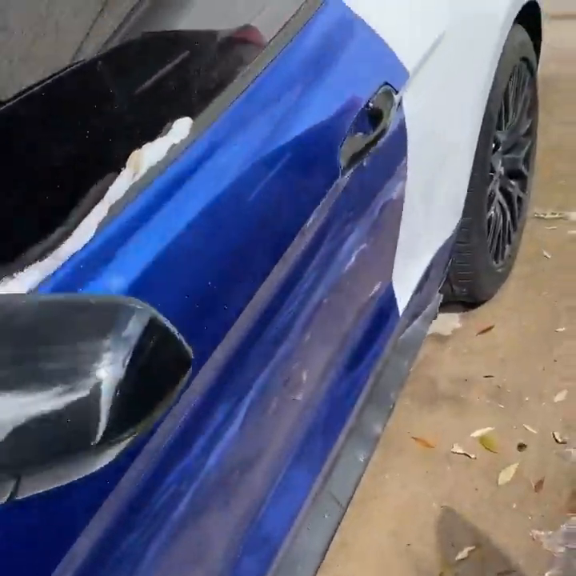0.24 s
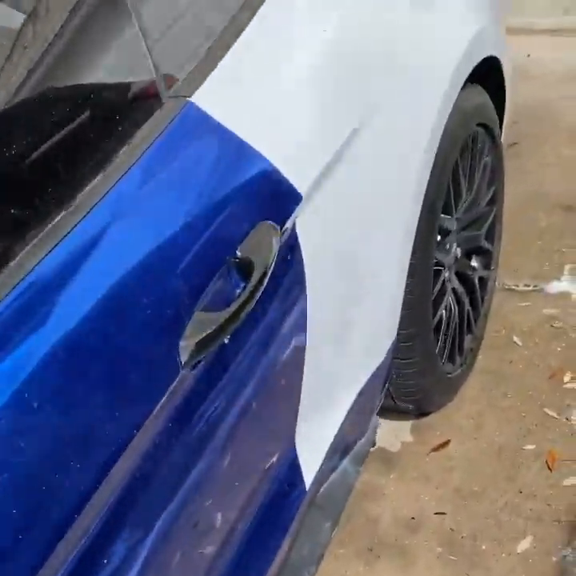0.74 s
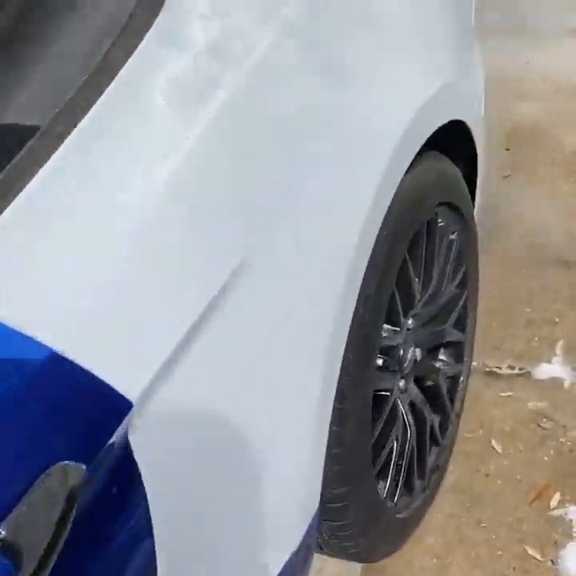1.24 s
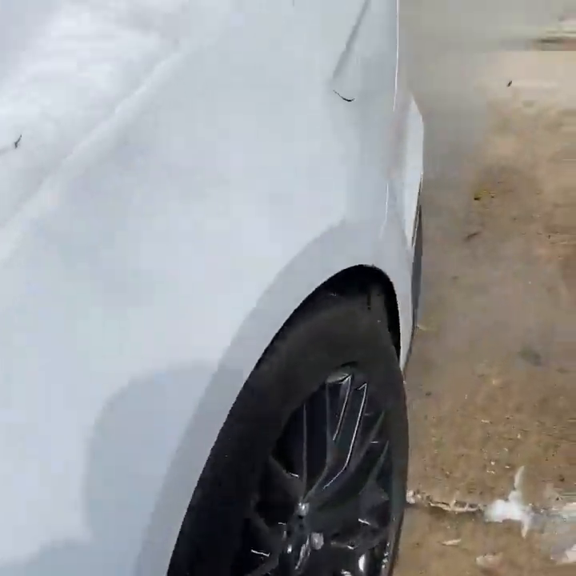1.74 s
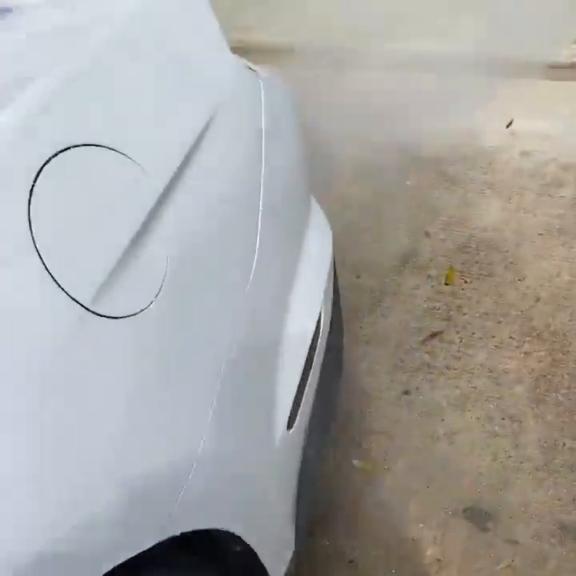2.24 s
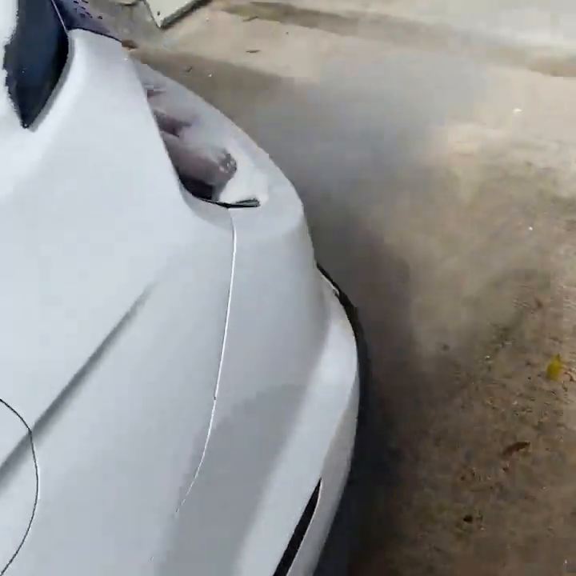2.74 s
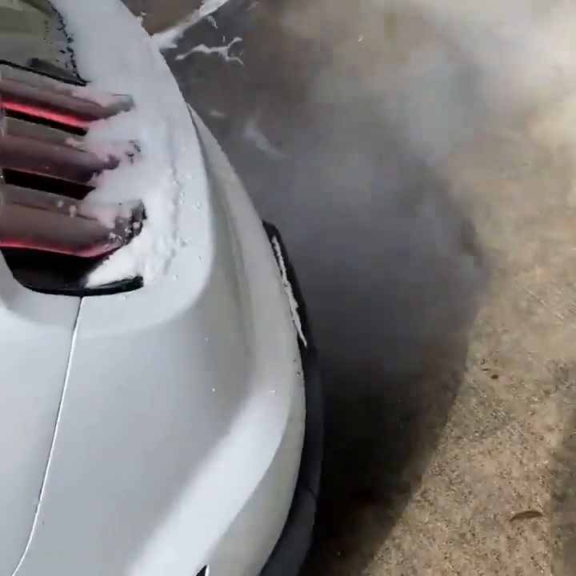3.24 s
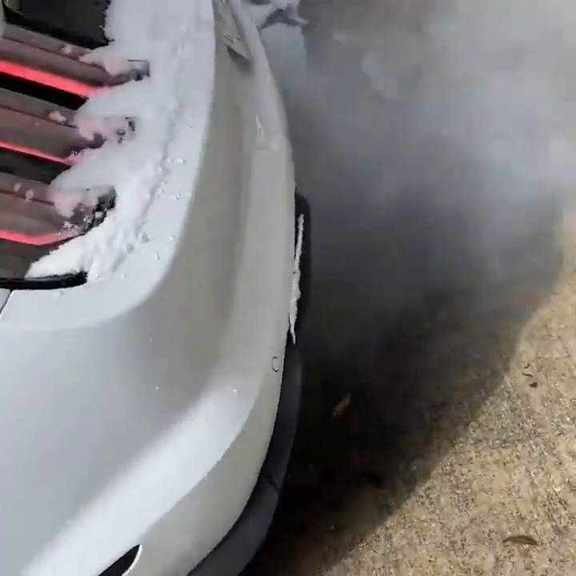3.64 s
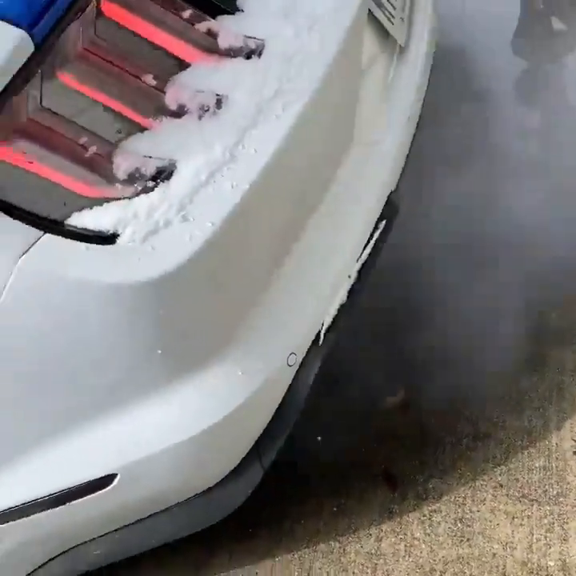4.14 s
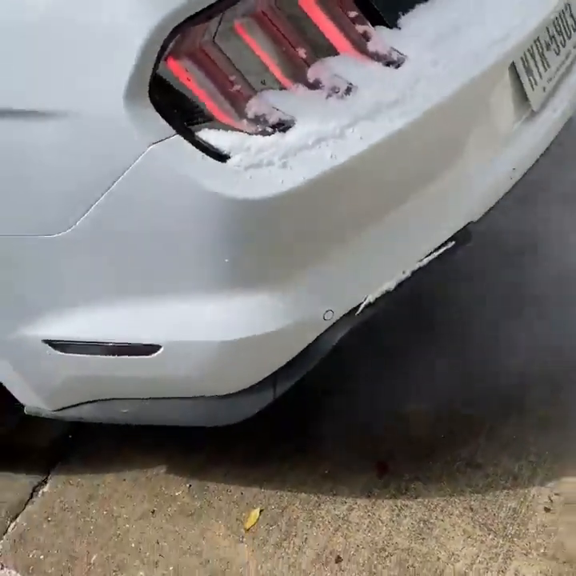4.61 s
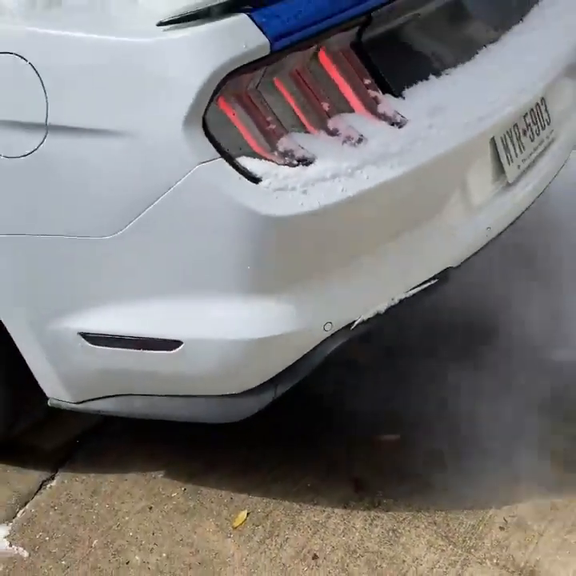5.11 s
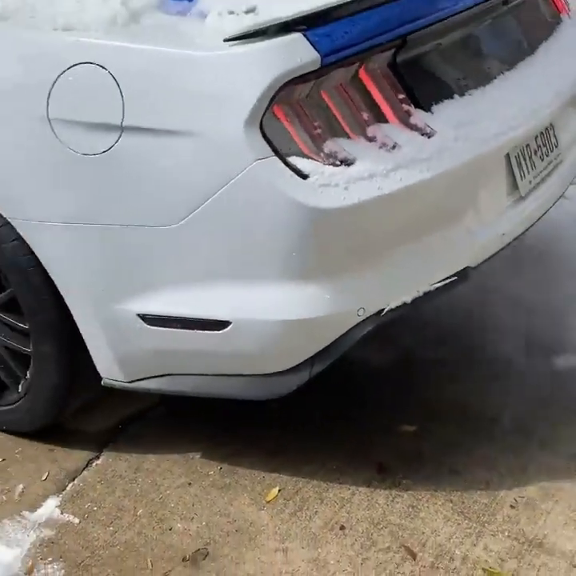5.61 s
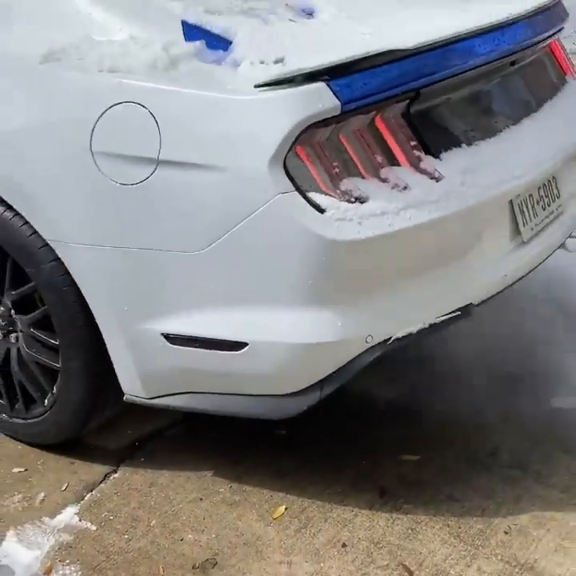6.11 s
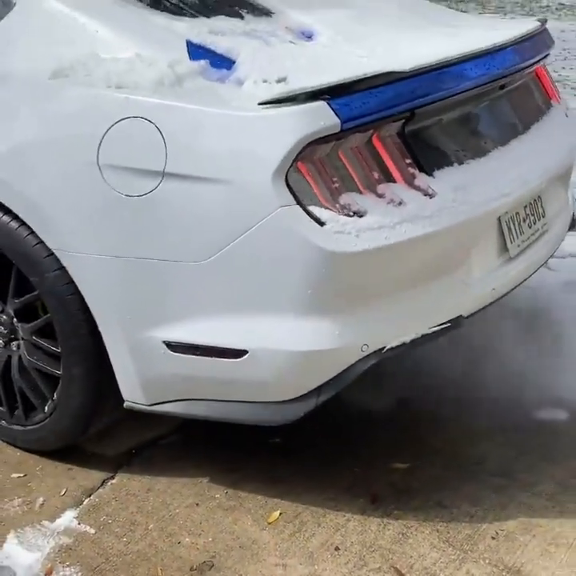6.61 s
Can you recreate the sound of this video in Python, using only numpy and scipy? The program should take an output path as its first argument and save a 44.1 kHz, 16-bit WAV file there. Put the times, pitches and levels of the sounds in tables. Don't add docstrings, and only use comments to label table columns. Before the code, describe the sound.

A big car engine with open exhaust idles fast and steadily outdoors on a concrete driveway. Deep droning rumble and a throaty bark carry rough gas puffs in a lumpy, quickly repeating chug, over low flutter and thin hiss. A handheld phone moves close along the side, then around the tail, so hollow ringing tones swell and fade and the rasp changes colour. A tiny grit tick sounds early on.

```python
import sys
import numpy as np
from scipy import signal
from scipy.fft import rfft, irfft, next_fast_len
from scipy.io import wavfile
from scipy.ndimage import uniform_filter1d

SR = 44100
rng = np.random.default_rng(int(sys.argv[2]) if len(sys.argv) > 2 else 0)


def natural_amplitude(level_db):
    exponent = np.asarray(level_db, float) / 20
    return 10 ** exponent


def inscribe(sig):
    pcm = np.round(np.clip(np.atleast_2d(sig).T, -1, 1) * 32767)
    wavfile.write(sys.argv[1], SR, pcm.astype(np.int16))


N = 302526

# time in seconds, lead in rounds of eight firings.
CRANK_LEAD = [(0.0, -1.048), (0.26, -1.068), (0.66, -1.088), (0.9, -1.0955), (1.46, -1.0925),
              (1.66, -1.0804), (1.86, -1.0809), (2.1, -1.0685), (2.4, -1.074), (2.66, -1.097),
              (2.9, -1.102), (3.6, -1.08), (4.46, -1.0608), (5.0, -1.037), (5.46, -1.0613), (6.1, -1.062),
              (6.86, -1.057)]
# bank (0 or 1), push in dB, delay down its short pipe in ms.
CYLINDERS = [(1, 0.0, 3.82), (1, -0.2, 3.46), (0, 2.6, 5.55), (1, -3.6, 3.53), (0, 2.5, 4.48),
             (0, -3.4, 3.7), (1, -3.2, 5.57), (0, 4.3, 4.29)]
# frequency in Hz, width in Hz, signed strength at the outlet.
PIPE_A = [(38.1, 120.0, 0.52), (89.1, 8.0, -5.63), (131.2, 9.8, 3.02), (190.1, 37.3, -2.02),
          (285.4, 120.0, 0.65), (335.7, 8.0, 1.13), (352.4, 62.0, -0.83), (528.7, 8.0, -0.66),
          (424.3, 8.0, 0.58), (684.1, 8.0, 0.22)]
PIPE_B = [(36.0, 33.1, 1.31), (90.3, 58.3, -1.31), (143.2, 27.5, 2.54), (193.4, 14.3, -2.67),
          (270.9, 16.4, 7.15), (297.0, 10.3, -4.76), (379.2, 9.4, -3.14), (517.0, 10.6, 2.57),
          (540.1, 8.0, -1.49), (646.5, 8.0, -0.99)]
PIPE_RANGES_HZ = [8, 105, 225, 320, 420, 700]
RASP_BEHIND_DB = [5, 3.5, 4.5, 2, 1.5, -.5, -5.5, -5]
RASP_BESIDE_DB = [5.5, 3.5, 5, 1.2, 0.3, -0.5, -2, -3]
# time in seconds, distance level in dB, facing the gas jets in dB,
# view of the first bank's outlet in dB.
WALK = [(0, 0, 2, 13.5), (.3, 1, 0.5, 6), (.9, 0, -2, -8), (1.3, -1, -1, -3), (1.7, -2.5, 1.5, -7.5),
        (2.0, -2.5, 1, 17), (2.45, -3, 1.5, 13.5), (2.95, -5, 1.5, 9.5), (3.2, -4, 0.5, 10.5),
        (3.45, -5, -1, 8.5), (4, -3, -1, -9.5), (4.55, -4.5, -0.5, 3), (5.1, -5, -2, 12),
        (5.6, -5, -4, -34), (6.1, -5, -4.5, -10), (6.86, -5.5, -4, 2.5)]
# frequency in Hz, level in dB per Hz.
JET_MID = [(250, -5), (420, -5), (445, -10.5), (507, -3.5), (598, -9.5), (642, -5.5), (697, -13.5),
           (924, -16), (1090, -12.5), (1180, -14), (1520, -15.5), (1900, -22), (2160, -17.5), (3140, -23.5),
           (7000, -24), (9100, -79.5), (15400, -120)]
JET_SIDE = [(120, -44), (200, -20), (277, -3), (322, -15), (374, -0.5), (447, -7.5), (926, -13.5),
            (1560, -29), (2660, -19.5), (7000, -18), (9100, -65.5), (15400, -120)]
# frequency in Hz, half width in Hz, strength in dB.
TAILPIPE = [(796, 6.4, -2.5), (943, 16, 3), (1059, 8.3, 0), (1284, 6.8, -0.5), (1510, 31, -13.5),
            (1720, 7.5, 6), (1972, 11, 4.5), (2690, 6.8, 4.5)]
# frequency in Hz, level in dB per Hz.
FLUTTER = [(12, -66), (20, -29.5), (37, -29), (58, -7), (91, 0), (140, -6), (279, 7), (420, -27.5),
           (550, -73), (920, -120)]
# frequency in Hz, level in dB per Hz.
AIR_MID = [(2000, -69), (3300, -14), (4500, 4), (7000, -0.5), (10000, -4.5), (12000, -6), (14000, -9.5),
           (16000, -120)]
AIR_SIDE = [(1500, -57), (2600, -13.5), (4500, -9), (7000, -2), (9500, -7), (9800, -11.5), (11000, -11.5),
            (14500, -13), (15700, -16), (17000, -120)]
# frequency in Hz, left minus right in dB.
LEAN = [(60, 1), (110, 0.5), (200, 2.5), (370, 3), (670, 3), (1230, 1), (2250, -0.5), (4110, -1.5),
        (7520, 0), (13800, -13.5)]
# time in seconds, lasting in seconds,
# frequency in Hz, lift in dB.
BAND_SPOTS = [(0.12, .3, 1700, 12), (0.073, 0.22, 850, -9), (0.35, 1.2, 57, -3.5), (0.425, 0.84, 786, 11.5),
              (.63, 0.34, 1474, 11.5), (1.09, 0.66, 525, 8.5), (5.1, 0.45, 985, 2.5),
              (1.43, 0.32, 938, 11.5), (1.57, 0.081, 1430, -11), (1.93, 0.28, 1043, 6.5),
              (2.44, 0.25, 277, -8), (2.64, 0.34, 668, -11.5), (2.85, 0.6, 450, 7), (3.998, 0.65, 410, 13),
              (5.6, .45, 660, 9.5), (4.5, 1.1, 560, 8), (3.74, 0.38, 904, 8), (0.67, 0.73, 140, -5),
              (2.9, 0.6, 147, 6), (4.365, .13, 970, -7), (4.928, 0.37, 1434, -15), (5.01, .25, 537, -14.5),
              (5.6, 1.9, 3110, 6), (5.292, 0.2, 797, -15), (5.793, 0.41, 1400, 6.5),
              (5.835, 0.14, 974, -15), (6.17, .75, 830, 13.5), (8, 0.19, 3400, 9), (6.3, .5, 1250, -3),
              (6.68, 0.99, 1544, 5.5)]
# time in seconds, extra level in dB.
ODD_BURNS = [(.085, 2.5), (.175, 2), (.44, 1), (1.75, 1), (1.2, 0.5), (1.576, 3), (1.92, 2), (2.8, -1.5),
             (3.15, 3.5), (3.418, 2), (4.381, 0.5), (5.07, 3.5), (5.5, 0), (6.55, 0.5)]
# time in seconds, peak in dB.
GRIT_TICK = [
    (1.357, -43.5),
]
# time in seconds, lasting in seconds, lift in dB.
RING_SWELLS = [
    (0.16, 0.31, 13.5),
    (0.657, 0.31, 13),
    (1.188, 0.13, 4.5),
    (1.907, 0.29, 13),
    (2.783, 0.48, 17),
    (3.293, 0.47, 7),
    (4.114, 0.37, 9),
    (4.946, 0.47, 12),
    (5.6, 0.3, 4.5),
    (6.7, 0.16, 3),
]

ROUND_HZ = 11.41
RUN_UP_S = 1 / 4
CORNER_S, CORNER_TAKES_S = 2.75, 0.15
DRONE_DB, BODY_DB, UPPER_DB, RING_DB = -9.5, -14, -32, -37.5
BARK_DB, BARK_FOCUS_DB = (-17, -14.5), (5, 2.5)
RING_HZ, BARK_HZ = (371, 382), (269, 303)
FOCUS_DB, FOCUS_GROWS = -6, 1
GROWL_DB, RASP_DB, FLUTTER_DB = -25, -27, -24
BODY_FALLS, RASP_SWINGS, GROWL_SWINGS = 1.23, 0.89, 1.1
UNEVEN, REPEAT = (0.71, 1.02), (0.54, 0.78)
SPLIT_HZ = 800
AIR_CHUG = 0.16
SPOT_WIDTH_HZ = 52.5
SHADE_S, LIP_HZ, LIP_DB = 4.6, 3170, 1
STARVED, STARVED_HZ = 0.087, 4430
MID_GAP_HZ, MID_TOP_HZ, EDGE_SLIP_HZ = (7650, 9600), 13800, 700


def unit(x):
    return x / np.sqrt(np.mean(x ** 2) + 1e-20)


def along(points, hz):
    f, value = np.transpose(points)
    return np.interp(np.log(hz + 1), np.log(f + 1), value)


def curves(rows):
    s, *columns = np.transpose(rows)
    return [np.interp(np.arange(N) / SR, s, column) for column in columns]


def rounding(pair):
    behind = (1 + np.tanh((np.arange(N) / SR - CORNER_S) / CORNER_TAKES_S)) / 2
    return pair[0] + (pair[1] - pair[0]) * behind


def filtered(x, response):
    m = next_fast_len(N + SR)
    return irfft(rfft(x, m) * response(np.fft.rfftfreq(m, 1 / SR)), m)[..., :N]


def levelled(x, span=0.33):
    return x / np.sqrt(np.abs(uniform_filter1d(x ** 2, int(span * SR))) + 1e-12)


def firings():
    s, lead = np.transpose(CRANK_LEAD)
    t = np.arange(-SR // 4, N) / SR
    turn = ROUND_HZ * t + np.interp(t, s, lead)
    rounds = np.arange(np.ceil(turn[0]), np.floor(turn[-1]) + 1)
    due = rounds[:, None] + np.arange(8) / 8
    return np.interp(due, turn, t, right=N), rng.standard_normal(due.shape + (4,))


def train(times, sizes):
    at = np.round((times.ravel() + RUN_UP_S) * SR).astype(int)
    keep = (at >= 0) & (at < N + SR // 4)
    return np.bincount(at[keep], sizes.ravel()[keep], N + SR // 4)


def settle(x, response):
    m = next_fast_len(len(x) + SR)
    return irfft(rfft(x, m) * response(np.fft.rfftfreq(m, 1 / SR)), m)[SR // 4:][:N]


def pipe_response(modes, f):
    ring = sum(g * 1j * f * w / (c * c - f * f + 1j * f * w) for c, w, g in modes)
    return ring / (1 + (30 / (f + 1)) ** 2)


def pipes(times, chance):
    bank, push_db, lag_ms = np.transpose(CYLINDERS)
    at = times + (lag_ms + 0.068 * chance[..., 0]) / 1000
    size = natural_amplitude(push_db + 0.34 * chance[..., 1])
    tones = []
    for side, modes in enumerate([PIPE_A, PIPE_B]):
        clicks = train(at, size * (bank == side))
        tones.append(settle(clicks, lambda f: pipe_response(modes, f)))
    tones = np.array(tones)

    ranges = []
    for low, high in zip(PIPE_RANGES_HZ, PIPE_RANGES_HZ[1:]):
        ranges.append(filtered(tones, lambda f: (f >= low) & (f < high)))
    drone, body, bark, ring, upper = ranges
    loss_db, facing_db, view_db = curves(WALK)

    bark = natural_amplitude(view_db) * bark[0] + bark[1]
    bark_core = filtered(bark, lambda f: (f > BARK_HZ[0]) & (f < BARK_HZ[1]))
    bark = bark + (natural_amplitude(rounding(BARK_FOCUS_DB)) - 1) * bark_core

    t = np.arange(N) / SR
    swell_db = sum(db * np.exp(-((t - s) / lasts) ** 2) for s, lasts, db in RING_SWELLS)
    focus_db = FOCUS_DB + FOCUS_GROWS * swell_db
    ring = ring.sum(0)
    ring_core = filtered(ring, lambda f: (f > RING_HZ[0]) & (f < RING_HZ[1]))
    ring = ring + (natural_amplitude(focus_db) - 1) * ring_core

    sound = natural_amplitude(DRONE_DB + loss_db) * levelled(drone.sum(0))
    sound += natural_amplitude(BODY_DB + BODY_FALLS * loss_db) * levelled(body.sum(0))
    sound += natural_amplitude(rounding(BARK_DB)) * levelled(bark)
    sound += natural_amplitude(RING_DB + swell_db) * levelled(ring)
    sound += natural_amplitude(UPPER_DB + facing_db) * levelled(upper.sum(0))
    return sound


def bursts(at, size, repeat, colour):
    t = np.arange(SR // 16) / SR
    shape = (1 - np.exp(-t / 0.0011)) * (np.exp(-t / 0.008) + np.exp(-t / 0.02))
    pattern = np.zeros((2, N))
    for cylinder in range(8):
        echo = rng.standard_normal((2, len(t))) * shape
        clicks = train(at[:, cylinder], size[:, cylinder])[None]
        pattern += signal.fftconvolve(clicks, echo, axes=1)[:, SR // 4:][:, :N]
    turn = 1.213 * np.arange(N) / SR
    pattern = np.cos(turn) * pattern + np.sin(turn) * pattern[::-1] * [[1], [-1]]
    pattern = filtered(unit(pattern), lambda f: 1 / (1 + (f / 4500) ** 4))

    power = signal.fftconvolve(train(at, size ** 2), shape ** 2)[SR // 4:][:N]
    fresh = unit(np.sqrt(np.abs(power)) * rng.standard_normal((2, N)))
    share = np.clip(repeat, 0, 1)
    blow = filtered(np.sqrt(share) * pattern + np.sqrt(1 - share) * fresh, colour)
    return blow / np.sqrt(np.abs(uniform_filter1d(blow[0] ** 2, SR // 3)) + 1e-12)


def jet_colour(f):
    sing = 1 + sum(natural_amplitude(db) / (1 + ((f - c) / w) ** 2) for c, w, db in TAILPIPE)
    return sing * natural_amplitude([along(JET_MID, f), along(JET_SIDE, f) - 10])


def rasp_colour(f):
    return jet_colour(f) * (f >= SPLIT_HZ) * natural_amplitude([[0], [1]]) / (1 + (f / 4300) ** 4)


def gas(times, chance):
    facing_db, repeat = curves(WALK)[1], rounding(REPEAT)
    depth = np.interp(times, np.arange(N) / SR, rounding(UNEVEN))
    chug_db = depth * np.where(times < CORNER_S, RASP_BESIDE_DB, RASP_BEHIND_DB)
    odd_db = sum(db * np.exp(-((times - s - 0.02) / 0.035) ** 2) for s, db in ODD_BURNS)
    burn_db = 1.0 * chance[..., 2] + odd_db
    at = times + (-3.5 + 0.025 * chance[..., 3]) / 1000
    growl_size = natural_amplitude(0.31 * chug_db + burn_db)
    growl = bursts(at, growl_size, repeat + 0.37, lambda f: jet_colour(f) * (f < SPLIT_HZ))
    rasp = bursts(at, natural_amplitude(0.85 * chug_db + burn_db), repeat, rasp_colour)
    growl = natural_amplitude(GROWL_DB + GROWL_SWINGS * facing_db) * growl
    return growl + natural_amplitude(RASP_DB + RASP_SWINGS * facing_db) * rasp


def flutter():
    noise = filtered(rng.standard_normal(N), lambda f: natural_amplitude(along(FLUTTER, f)))
    return natural_amplitude(FLUTTER_DB + BODY_FALLS * curves(WALK)[0]) * unit(noise)


def passing_bands(x, patchy_db, wide, long):
    hz, s, z = signal.stft(x, SR, nperseg=2048)
    field = uniform_filter1d(rng.standard_normal(z.shape[-2:]), int(wide), 0)
    field = uniform_filter1d(field, int(long), 1)
    patches = patchy_db * unit(field)
    db = patches / (1 + (hz[:, None] / 3500) ** 2) * (hz[:, None] > PIPE_RANGES_HZ[4])
    shaded = (1 + np.tanh((s - SHADE_S) / 0.16)) / 2
    db -= LIP_DB * np.outer(hz > LIP_HZ, shaded)
    for at, lasts, centre_hz, lift_db in BAND_SPOTS:
        across = (hz - centre_hz) / (SPOT_WIDTH_HZ * (0.6 + centre_hz / 1000))
        passing = np.exp(-((s - at) / lasts) ** 2)
        db += 0.86 * lift_db * np.outer(np.exp(-across ** 2), passing)
    return signal.istft(z * natural_amplitude(db), nperseg=2048)[1][..., :N]


def air(car):
    noise = rng.standard_normal((2, N))
    for s, db in GRIT_TICK:
        start = round(s * SR)
        noise[:, start:start + 150] *= natural_amplitude(db + 47.5)
    hiss = filtered(noise, lambda f: natural_amplitude([along(AIR_MID, f), along(AIR_SIDE, f)]))
    rasp = filtered(car, lambda f: f > 2 * SPLIT_HZ) ** 2
    quick, slow = uniform_filter1d(rasp, SR // 50), uniform_filter1d(rasp, SR // 2)
    chug = np.abs(quick / slow) ** (AIR_CHUG / 2)
    return natural_amplitude(-49) * chug * hiss / hiss.std(axis=1, keepdims=True)


def ear_lean(f):
    balance = natural_amplitude(np.outer([0.5, -0.5], along(LEAN, f)))
    return balance * np.exp(np.outer([1j, -1j], 2 * np.pi * f / SR * 0.8))


def scene():
    times, chance = firings()
    car = gas(times, chance)
    car[0] += pipes(times, chance) + flutter()
    mid, side = passing_bands(car, patchy_db=3.5, wide=2.5, long=26)
    hiss, wide_hiss = air(mid)
    return filtered(mid, ear_lean) + hiss + np.outer([1, -1], side + wide_hiss)


def band_limit(x):
    return signal.sosfilt(signal.butter(12, 15750, fs=SR, output="sos"), x)


def record(dry):
    left, right = dry / (1 + np.abs(dry / 0.95) ** 6) ** (1 / 6)
    hz, s, z = signal.stft((left + right) / 2, SR, nperseg=2048)
    hz = hz[:, None]
    slip = rng.random(len(s)) ** 3 - (rng.random(len(s)) < 0.06)
    slip = EDGE_SLIP_HZ * np.repeat(slip, 2)[:len(s)]
    outside_gap = (hz < MID_GAP_HZ[0] - slip) | (hz > MID_GAP_HZ[1])
    kept = outside_gap & (hz < MID_TOP_HZ - slip)
    lost = rng.random((len(hz) // 4 + 1, len(s) // 3 + 1)) < STARVED
    holes = np.kron(lost, np.ones((4, 3)))[:len(hz), :len(s)]
    kept &= (holes == 0) | (hz < STARVED_HZ)
    mid = signal.istft(z * kept, nperseg=2048)[1][:N]
    side = (left - right) / 2
    return band_limit(np.array([mid + side, mid - side]))


dry = scene()
out = record(dry)
inscribe(out)
```